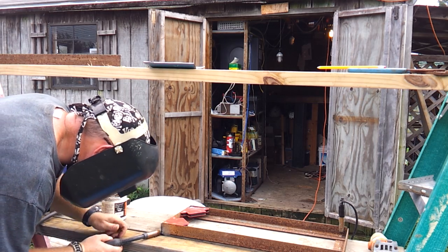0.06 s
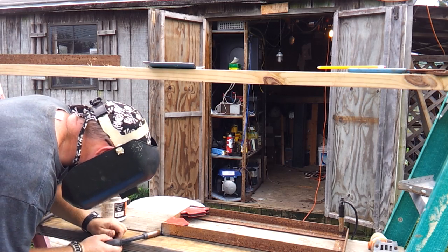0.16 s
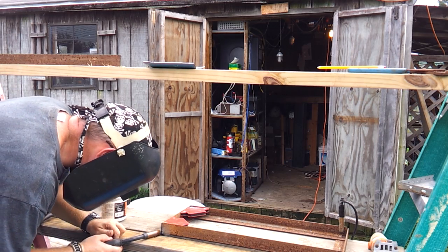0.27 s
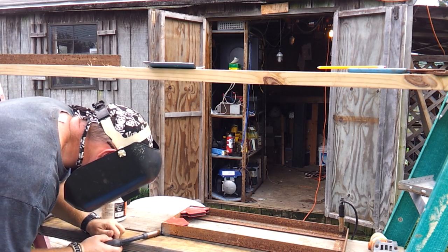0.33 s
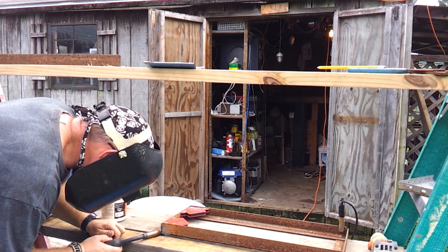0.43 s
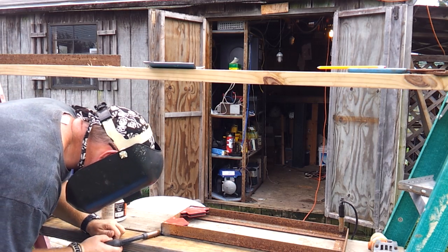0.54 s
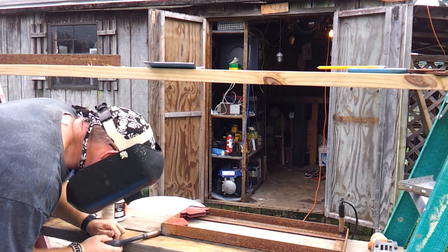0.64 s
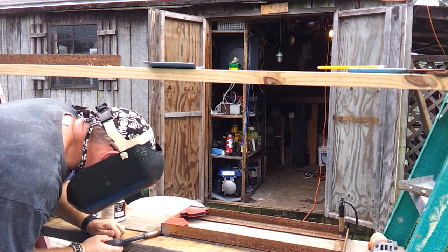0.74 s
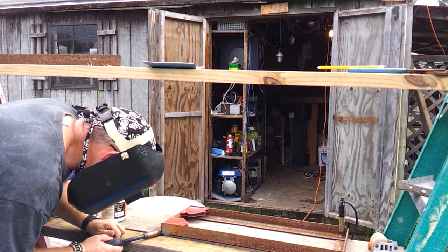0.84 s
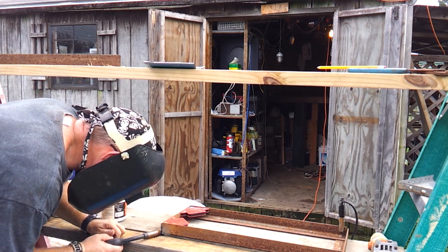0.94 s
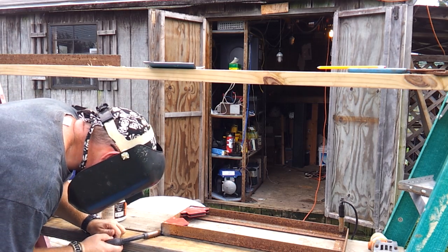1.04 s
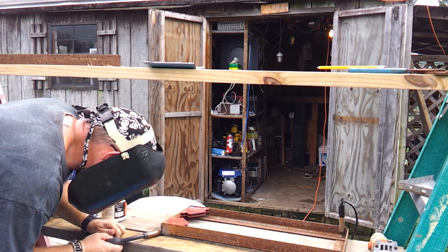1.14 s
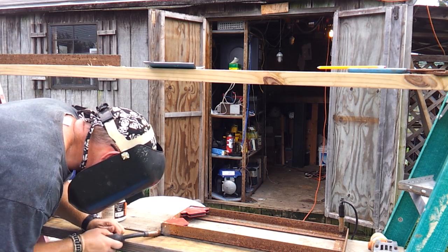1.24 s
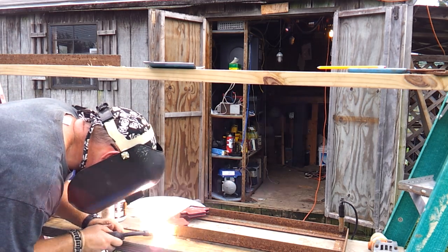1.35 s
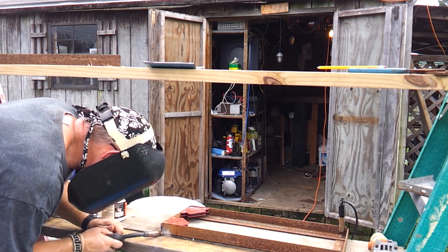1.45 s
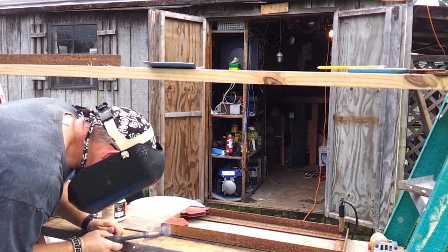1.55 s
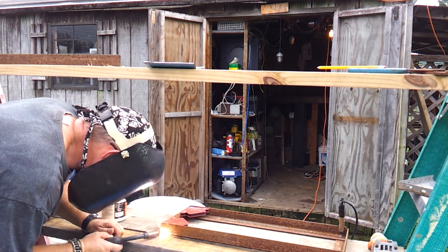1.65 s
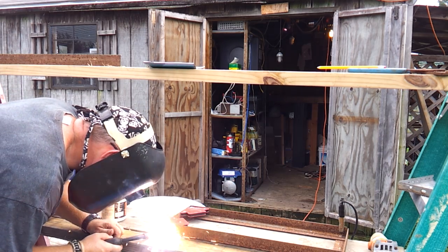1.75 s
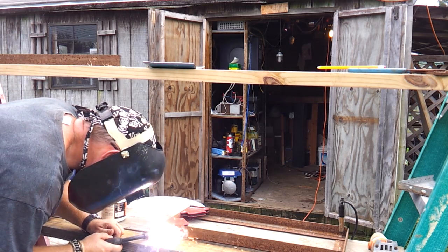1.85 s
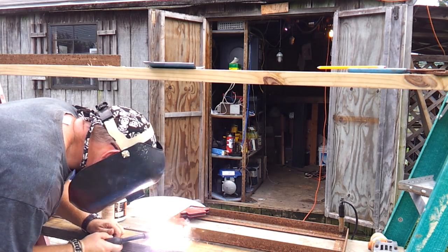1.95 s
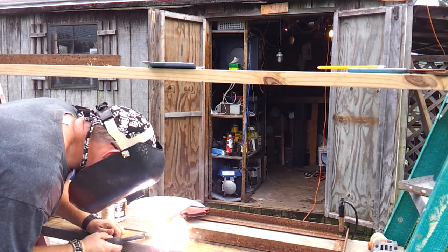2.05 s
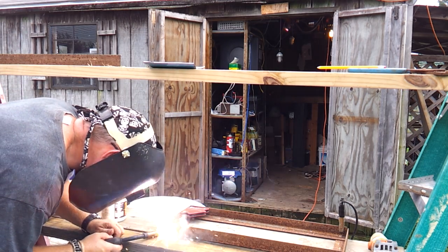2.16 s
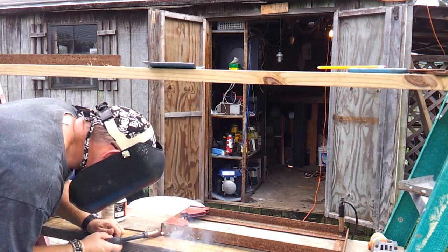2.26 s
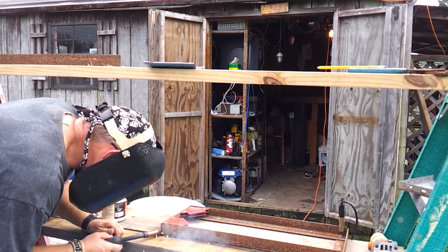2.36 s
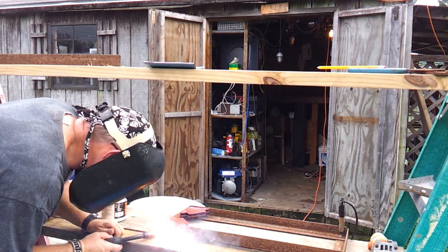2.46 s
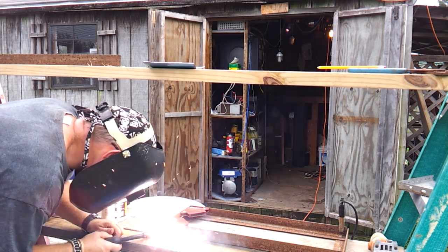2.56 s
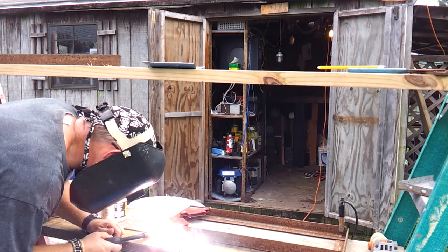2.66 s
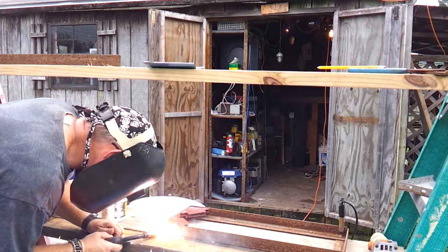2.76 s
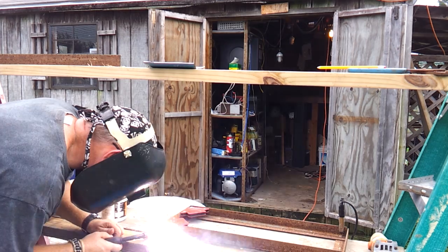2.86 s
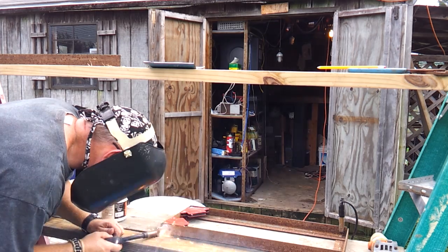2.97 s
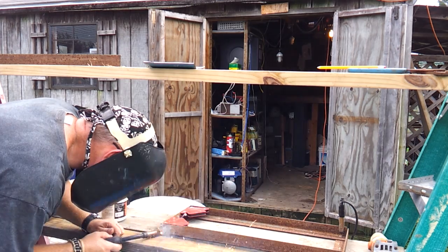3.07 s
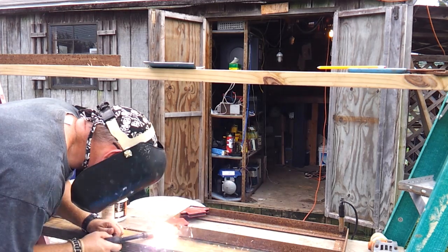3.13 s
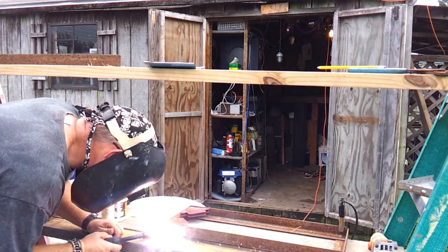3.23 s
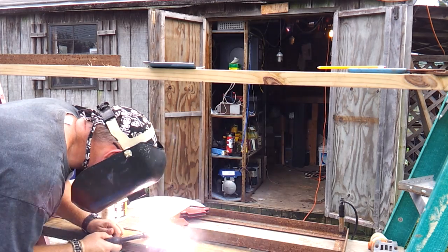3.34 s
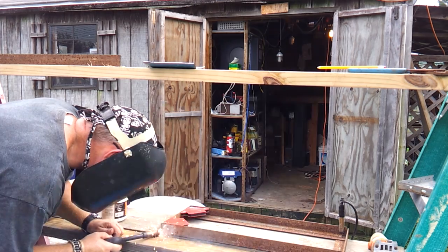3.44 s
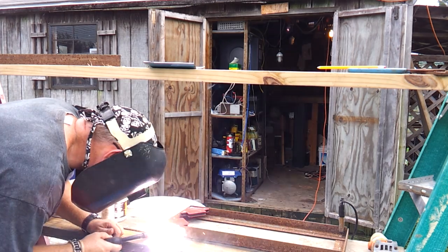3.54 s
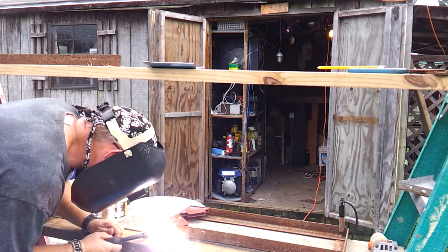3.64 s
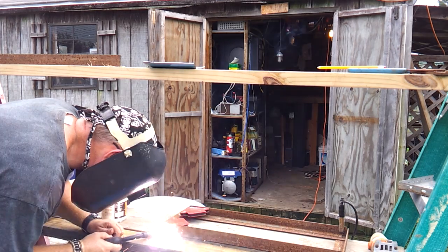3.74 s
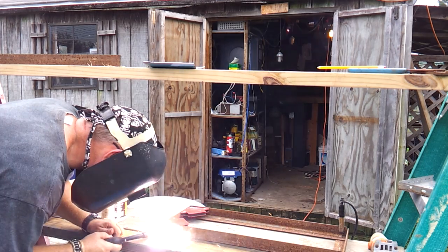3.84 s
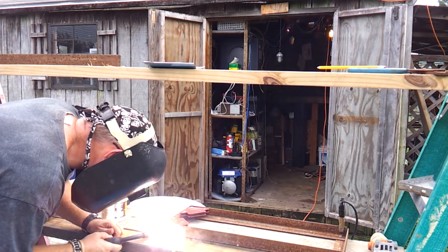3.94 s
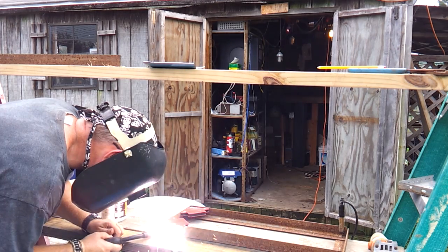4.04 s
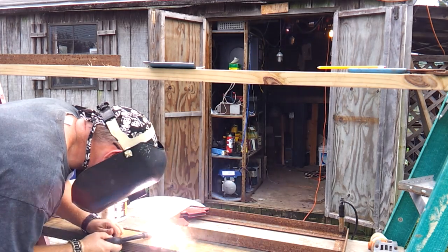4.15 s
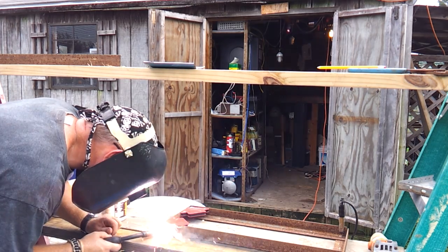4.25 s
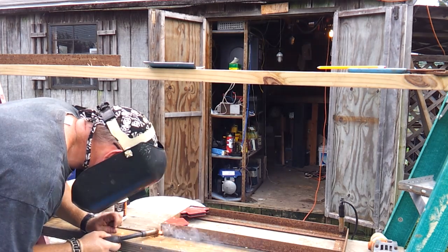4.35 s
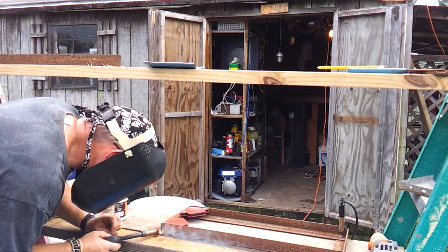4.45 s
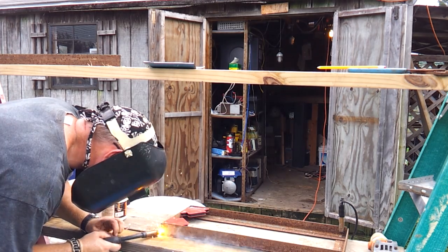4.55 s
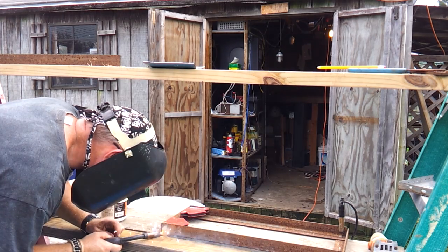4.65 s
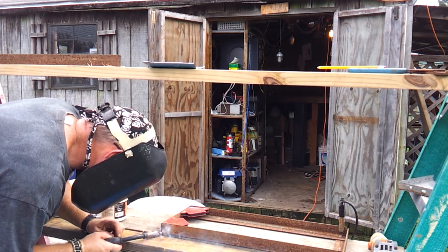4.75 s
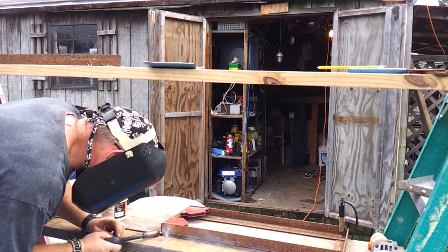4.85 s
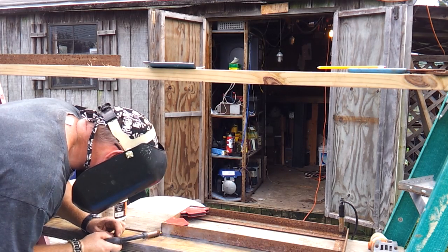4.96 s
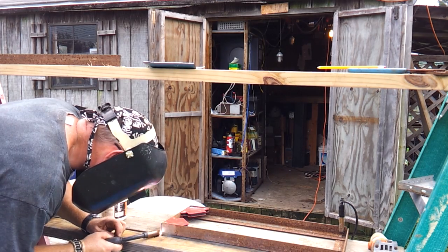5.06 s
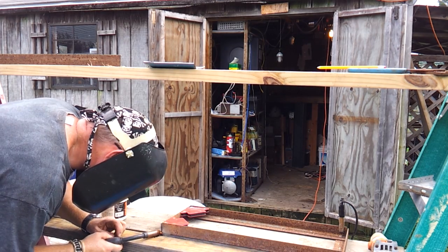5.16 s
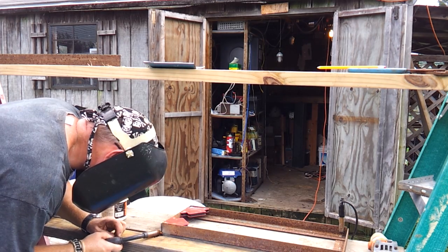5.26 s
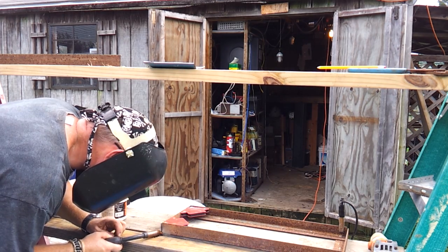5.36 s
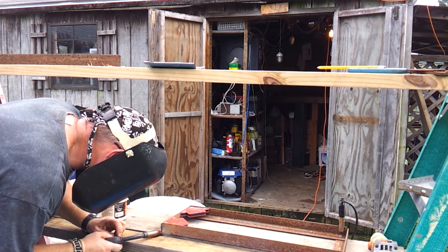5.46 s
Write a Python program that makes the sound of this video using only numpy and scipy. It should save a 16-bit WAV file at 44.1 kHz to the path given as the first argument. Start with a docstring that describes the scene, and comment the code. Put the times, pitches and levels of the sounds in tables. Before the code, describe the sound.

For the first 1.2 seconds there is only a low machine fan rumble, faint hum, smooth hiss and outdoor air, with a soft dull bump near 0.6. Two sharp pops at about 1.25 open the welding, followed by a tiny crackling burst near 1.35. From 1.65 to 2.2 the arc burns harder: bright frying sizzle, rapid buzzing snaps and loud cracks, flaring around 2.1. After a short pause, clipped spurts come between 2.5 and 2.8 and again near 2.9, with a small clink at 3.0. More dense, stuttering burns run from 3.2 to 4.35, separated by very short gaps. Last spits sound at 4.5 to 4.6. Then fan hum and hiss return, with a light metallic clink and weak tick near 5.1. The welding is close, dry and piercing, the steel ringing only briefly, with quick reflections from bench and shed and a faint duller tail.

```python
"""Short tack welds with a wire-feed welder, whose wire shorts and blows apart in sharp, noise-tailed pops.
Each burn sizzles with random sparks, flares up and spits droplets in step with the rectified mains.
A steel frame rings as damped modes; small clinks and dull low bumps come from the torch and the work.
Bench, mask and shed wall return echoes outdoors; fan rumble, hum, hiss and air are shaped noise and tones."""
import sys
import numpy as np
from scipy import signal
from scipy.fft import rfft, irfft
from scipy.io import wavfile
from scipy.ndimage import uniform_filter1d

SR = 44100
rng = np.random.default_rng(int(sys.argv[2]) if len(sys.argv) > 2 else 0)


def file_out(sig):
    """Save sig as 16-bit WAV at sys.argv[1]."""
    # one column per channel
    cols = np.atleast_2d(sig).T
    # limit, then scale
    lim = np.clip(cols, -1, 1)
    pcm = np.round(lim * 32767).astype(np.int16)
    wavfile.write(sys.argv[1], SR, pcm)


N = 242550
TIME = np.arange(N) / SR  # [s]

# the loudest pops, where the wire blows apart: (time [s], relative level [dB], midrange weight [dB])
POPS = [(1.2451, -19.5, -1), (1.2654, -0.5, 0), (1.3544, -3.5, -3), (1.358, -6, 13.5), (1.4143, -4, 0),
        (1.6564, -5.5, -10), (1.6627, -2.5, -16), (1.6868, -1, 3), (1.7023, -2, 16), (1.7135, -1, -2),
        (1.7479, 1.5, 8.5), (1.9225, -3, 9), (1.9312, -5.5, 4), (2.057, -5.5, -1.5), (2.0966, 0.5, 2.5),
        (2.49, -4.5, 2), (2.495, -2.5, 0.5), (2.5072, 0, 1), (2.513, -1.5, 4), (2.5732, -1.5, 5),
        (2.579, -1, -10), (2.6316, -5.5, 2), (2.9407, -3.5, -1.5), (3.166, -14, 3.5), (3.1821, -5.5, 7),
        (3.2086, -3, 5), (3.2222, 0, 0.5), (3.2577, 0, 4.5), (3.3164, -2, 3.5), (3.3306, -4.5, 0),
        (3.3573, -2.5, 2), (3.5482, -3, -2.5), (3.5993, -6.5, 2.5), (3.7572, -5, 0.5), (3.7731, -4, -6),
        (4.1157, -7, -13), (4.19, -5, 0.5), (4.2654, -6, 5), (4.3159, -4.5, 7.5), (4.516, -7.5, -2),
        (4.524, -2.5, 8), (4.606, -2.5, 4), (5.1005, -12, -20)]
# burns: (start [s], end [s], steady arc level [dB], flare centre [s], flare rise [dB], droplet scatter [dB])
BURNS = [(1.321, 1.399, -46, 1.36, 19.5, 1), (1.651, 1.733, -36.5, 1.672, 10, 7),
         (1.742, 2.201, -31.5, 2.118, 7, 4.5), (2.487, 2.533, -38, 2.5, 8, 4),
         (2.574, 2.684, -36, 2.58, 11, 5.5), (2.705, 2.806, -35, 2.765, 8.5, 8),
         (2.905, 2.981, -36.5, 2.925, 10.5, 1), (3.207, 3.397, -38.5, 3.28, 6.5, 3.5),
         (3.414, 3.453, -39.5, 3.44, 6, 2), (3.541, 3.699, -33, 3.55, 1.5, 3.5),
         (3.748, 4.022, -32, 4.01, 1.5, 2), (4.063, 4.212, -33, 4.13, 4, 3),
         (4.26, 4.343, -36.5, 4.32, 1, 3.5), (4.514, 4.592, -46, 4.52, 16, 3),
         (4.601, 4.622, -35, 4.605, 5.5, 2)]
# spectrum of a pop: (frequency [Hz], relative level [dB])
POP_SPECTRUM = [(150, -30.5), (500, -19.5), (1150, -15.5), (2300, -15.5), (2650, -18), (3050, -13.5),
                (3900, -19), (4800, -5.5), (5700, 0.5), (7500, -8), (8200, -23.5), (9800, -29.5),
                (11800, -20), (15400, -16.5)]
# spectrum of the sizzle, also of a clink's scrape: (frequency [Hz], relative level [dB])
SIZZLE_SPECTRUM = [(150, -30.5), (500, -23.5), (1150, -13.5), (2300, -10.5), (2650, -11), (3050, -9),
                   (3900, -8), (4800, -6), (5700, -1.5), (7600, -8.5), (8200, -20.5), (9800, -29),
                   (11800, -19), (15400, -15.5)]
# modes of the steel frame: (frequency [Hz], relative level [dB], 60 dB decay time [s])
FRAME_MODES = [(866, 11.5, 0.033), (1250, -10, 0.014), (2130, -48, 0.041), (3140, 11, 0.019),
               (4400, -13, 0.032), (5540, -4, .05), (6580, 13.5, 0.019)]
# small metal clinks at the torch: (time [s], level [dB], ring frequency [Hz], ring level set against scrape [dB])
CLINKS = [(2.9894, -23.5, 2440, -1.5), (3.449, -39, 2520, 9.5), (4.014, -30, 2550, 3),
          (5.097, -28.5, 2400, -7)]
# soft low bumps at the work: (time [s], level [dB], centre frequency [Hz], length [s])
BUMPS = [(0.617, -40, 180, 0.048), (1.26, -43, 314, 0.096), (1.693, -50, 223, 0.049),
         (2.567, -43, 298, 0.02), (3.178, -43.5, 270, 0.056), (4.529, -48, 302, 0.098)]
# early reflections from bench, mask and shed wall: (delay [s], level against direct sound [dB])
ECHOES = [(.00089, -10), (.00166, -22), (.00213, -19), (.0089, -23), (.0176, -23)]
# the background sinks while the welding goes on: (time [s], rumble level [dB], hiss level [dB])
BACKGROUND_LEVELS = [(0, -49.5, -51.5), (.75, -47, -51), (1.6, -49.5, -52.5), (2.3, -56.5, -57.5),
                     (3.0, -53.5, -53.5), (3.8, -57, -62), (4.8, -49.5, -49.5), (5.5, -49.5, -50)]
# spectrum of the machine's fan: (frequency [Hz], relative level per hertz [dB])
RUMBLE_SPECTRUM = [(25, -28), (55, -22), (100, -5.5), (135, 0), (195, -4), (245, 1), (320, -7.5),
                   (450, -9.5), (560, -7), (690, -13), (1000, -14), (2500, -25.5), (5000, -62)]
# spectrum of the hiss: (frequency [Hz], relative level [dB])
HISS_SPECTRUM = [(1000, -29), (2200, -8.5), (3800, -7.5), (5000, -3), (5900, -0.5), (6700, -2), (7600, -14),
                 (9500, -16.5), (13000, -23), (15300, -13)]
# hum lines of the machine: (frequency [Hz], rms level before wavering and sinking [dB])
HUM_LINES = [(60, -62.5), (141, -60.5), (241, -58.5), (560, -63.5), (6406, -62.5)]
# outdoor air: (time [s], low boom level [dB], midrange rush level [dB], thin high hiss level [dB])
AIR_LEVELS = [(0, -56, -62.5, -52), (.85, -59, -57.5, -50.5), (1.4, -67, -61.5, -67), (4.3, -75, -74, -82),
              (4.75, -54.5, -68, -76), (5.5, -55, -59.5, -72)]

PULSE_HZ, CREST_S = 120, .0072  # rate of the rectified mains, time of its first crest
LEAD = 160  # samples of faint swell before the peak of a crack
FLARE_S = 0.027  # standard deviation of the bell-shaped flare
ATTACK_S, RELEASE_S = 0.0014, .003  # the arc lights and goes out
SPIT_MAX_DB = -7  # upper limit on a droplet's level
TOP_HZ = 15900  # upper edge of the final pass band


def undb(db):
    """Decibels are logarithmic: 20 dB is a tenfold amplitude."""
    return 10 ** (np.asarray(db) / 20)


def unit(x):
    """Normalisation by root-mean-square amplitude, to rms 1."""
    return x / np.sqrt(np.mean(x ** 2))


def curves(table):
    """Linear interpolation in time of every column after the first."""
    s, *columns = np.transpose(table)
    return [np.interp(TIME, s, column) for column in columns]


def add(out, s, sound):
    """Superposition: sounds sum where they overlap, this one from time s."""
    i = int(round(s * SR))
    out[i:i + len(sound)] += sound[:N - i]


def through(x, impulse_response):
    """A linear system acts by convolution with its impulse response."""
    return signal.fftconvolve(x, impulse_response)[:len(x)]


def response(points, size=1024):
    """Minimum phase: folding the cepstrum gives a causal response of known spectrum, here at unit energy."""
    hz, db = np.transpose(points)
    f = np.maximum(np.fft.rfftfreq(size, 1 / SR), 1)
    gain = undb(np.interp(np.log(f), np.log(hz), db))
    cepstrum = irfft(np.log(gain))
    cepstrum[1:size // 2] *= 2
    cepstrum[size // 2 + 1:] = 0
    h = irfft(np.exp(rfft(cepstrum)))
    return h / np.linalg.norm(h)


def band(x, lo_hz, hi_hz, order=2):
    """Band-pass filtering with a maximally flat (Butterworth) pass band."""
    edges_hz = [lo_hz, min(hi_hz, SR / 2 - 1)]
    return signal.sosfilt(signal.butter(order, edges_hz, "band", fs=SR, output="sos"), x)


def walk(rate):
    """Random modulation, slow or fast by rate: levels held 1 / rate s, two moving averages, rms 1."""
    k = int(SR / rate)
    steps = np.repeat(rng.standard_normal(N // k + 1), k)
    smooth = uniform_filter1d(uniform_filter1d(steps, k), k)
    return unit(smooth[:N])


def crack(db, body_db, tail_db=-9, tail_s=0.0035, swell_db=-13, swell_s=0.0028, body_hz=2300, vary_db=2.15):
    """Impulsive excitation: a noise burst with a sharp peak, a faint swell before it and a noisy tail after."""
    t = (np.arange(1024) - LEAD) / SR
    tail = rng.standard_normal(len(t)) * np.exp(-abs(t) / tail_s) * (t > 0)
    swell = rng.standard_normal(len(t)) * np.exp(-abs(t) / swell_s) * (t < 0)
    burst = (t == 0) + undb(tail_db) * tail / np.linalg.norm(tail)
    burst = burst + undb(swell_db) * swell / np.linalg.norm(swell)
    hz, level_db = np.transpose(POP_SPECTRUM)
    # each crack has its own midrange weight, independent of its loudness
    body = np.exp(-np.log(hz / body_hz) ** 2 / 2) * (hz < 2 * body_hz)
    # random spectral deviations make every crack different
    level_db = level_db + body_db * body + vary_db * rng.standard_normal(len(hz))
    return undb(db) * through(burst, response(np.transpose([hz, level_db])))


def pops(pop_db=5.5):
    """Explosive rupture: each big short circuit is one sharp crack."""
    out = np.zeros(N)
    for s, db, body_db in POPS:
        add(out, s - LEAD / SR, crack(db + pop_db, body_db))
    return out


def burning():
    """Amplitude envelope of the arc: each burn lights fast, holds, flares in a bell shape and dies exponentially."""
    out = np.zeros(N)
    for start, end, steady_db, flare_at, flare_db, _ in BURNS:
        attack = np.clip((TIME - start) / ATTACK_S, 0, 1)
        release = np.exp(-np.maximum(TIME - end, 0) / RELEASE_S)
        flare = np.exp(-.5 * ((TIME - flare_at) / FLARE_S) ** 2)
        out = np.maximum(out, attack * release * undb(steady_db + flare_db * flare))
    return out


def snaps(strength, jitter_s=0.0008, snap_db=20, body_spread_db=6):
    """Periodic excitation with jitter: a droplet snaps off near each mains crest, at a level led by the arc."""
    out, pop_times = np.zeros(N), np.transpose(POPS)[0]
    crests = np.arange(CREST_S, N / SR, 1 / PULSE_HZ)
    chance = rng.standard_normal((len(crests), 3))
    for start, end, *_, spit_db in BURNS:
        for crest, (late, size, body) in zip(crests, chance):
            # no droplet within half a pulse of a pop
            clear_of_pops = np.min(abs(pop_times - crest)) > .5 / PULSE_HZ
            if start < crest < end and clear_of_pops:
                arc_db = 20 * np.log10(strength[int(crest * SR)] + 1e-9)
                db = min(arc_db + snap_db + spit_db * size, SPIT_MAX_DB)
                add(out, crest + jitter_s * late - LEAD / SR, crack(db, body_spread_db * body))
    return out


def sizzle(strength, fry_db=-3, throb_db=2, grain_rate=2000, grain_db=4.0):
    """Shot noise: dense tiny sparks swell with each mains half wave; the restless weld pool shifts their colour."""
    size = undb(grain_db * np.clip(rng.standard_normal(N), -2, 2))
    # grain_rate: mean sparks per second
    sparks = (rng.random(N) < grain_rate / SR) * rng.standard_normal(N) * size
    throb = undb(throb_db * np.cos(2 * np.pi * PULSE_HZ * (TIME - CREST_S)))
    sparks = unit(sparks * throb)
    rest = through(strength * sparks, response(SIZZLE_SPECTRUM))
    out = 0
    # peel off bands from the bottom up; each has its own slow wavering and fast flutter
    for edge_hz in (1600, 2800, 4200, 5400, 6400, 9000, 18000):
        part = signal.sosfiltfilt(signal.butter(6, edge_hz, fs=SR, output="sos"), rest)
        rest = rest - part
        out = out + part * undb(1.6 * walk(14) + 2.2 * walk(180))
    return undb(fry_db) * out


def frame(arc, ring_db=-50):
    """Modal resonance: the arc knocks on the steel, whose damped modes ring briefly."""
    t = TIME[:SR // 4]
    modes = sum(undb(db - 60 * t / t60) * np.sin(2 * np.pi * hz * t) for hz, db, t60 in FRAME_MODES)
    return undb(ring_db) * through(arc, modes)


def clinks(scrape_s=0.0021, ring_t60=0.013):
    """Friction excitation: a tiny scrape of metal drives one well-damped mode."""
    out, t = np.zeros(N), TIME[:SR // 10]
    for s, db, hz, ring_db in CLINKS:
        # the scrape is strongest at scrape_s
        touch = t / scrape_s * np.exp(.5 - .5 * (t / scrape_s) ** 2)
        rub = rng.standard_normal(len(t)) * touch
        scrape = through(rub, response(SIZZLE_SPECTRUM))
        ring = through(rub, np.sin(2 * np.pi * hz * t) * undb(-60 * t / ring_t60))
        add(out, s, undb(db) * (scrape + undb(ring_db) * ring / ring.max()))
    return out


def bumps(width=1.45):
    """Band-limited noise bursts: dull swells of low sound rise fast and die away."""
    out, t = np.zeros(N), TIME[:SR // 3]
    for s, db, hz, length in BUMPS:
        age = 2 * t / length
        noise = band(rng.standard_normal(len(t)), hz / width, hz * width)
        swell = noise * np.sqrt(age) * np.exp(-age)
        add(out, s, undb(db) * swell / np.sqrt(np.sum(swell ** 2) / (length * SR)))
    return out


def yard(x, wash_db=-13, t60=0.16, far_db=-24, far_t60=0.85, far_top_hz=3500):
    """Reflection and scattering: hard near echoes, a short scatter from clutter, a duller tail from the shed."""
    t = TIME[:SR]
    h = np.zeros(N)
    for db, decay_s, top_hz in ((wash_db, t60, 9000), (far_db, far_t60, far_top_hz)):
        noise = band(rng.standard_normal(len(t)), 240, top_hz, order=1)
        scatter = noise * undb(-60 * t / decay_s) * (t > .002)
        add(h, 0, undb(db) * scatter / np.linalg.norm(scatter))
    for s, db in ECHOES:
        add(h, s, undb([db]))
    return x + through(x, h[:SR])


def background(waver_db=2):
    """Random modulation of continuous sources: fan rumble, wavering hum lines, smooth hiss and outdoor air."""
    rumble_db, hiss_db = curves(BACKGROUND_LEVELS)
    rumble = unit(through(rng.standard_normal(N), response(RUMBLE_SPECTRUM, size=8192))) * undb(walk(9))
    hiss = through(rng.standard_normal(N), response(HISS_SPECTRUM)) * undb(.5 * walk(15))
    hum = 0
    for hz, db in HUM_LINES:
        tone = np.sqrt(2) * np.sin(2 * np.pi * hz * TIME + 0.29 * walk(7))
        hum = hum + undb(db + waver_db * walk(5.8)) * tone
    # the hum sinks with the rumble, but less
    hum = hum * undb(0.7 * (rumble_db - rumble_db.max()))
    air = 0
    for db, (lo_hz, hi_hz) in zip(curves(AIR_LEVELS), ((50, 120), (450, 1560), (13800, 18200))):
        air = air + undb(db) * unit(band(rng.standard_normal(N), lo_hz, hi_hz))
    return undb(rumble_db) * rumble + undb(hiss_db) * hiss + air + hum


def scene():
    """Superposition: arc, frame and torch echo in the yard; bumps and background are added dry."""
    strength = burning()
    arc = pops() + snaps(strength) + sizzle(strength)
    welding = yard(arc + frame(arc) + clinks())
    return (welding + bumps() + background())[None]


def record(dry, ceiling=0.81, low_cut_hz=46):
    """Band limiting and soft saturation: deep bass is dropped, high peaks are rounded, the top is cut."""
    thin = signal.sosfilt(signal.butter(4, low_cut_hz, "high", fs=SR, output="sos"), dry)
    rounded = thin / (1 + (thin / ceiling) ** 4) ** (1 / 4)
    return signal.sosfilt(signal.ellip(8, .2, 70, TOP_HZ, fs=SR, output="sos"), rounded)


dry = scene()
out = record(dry)
file_out(out)
```